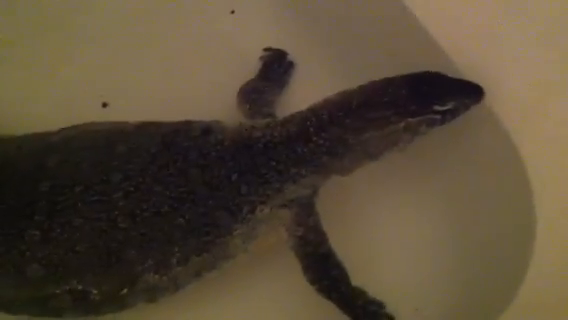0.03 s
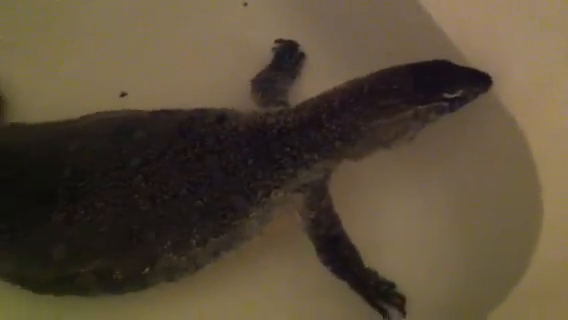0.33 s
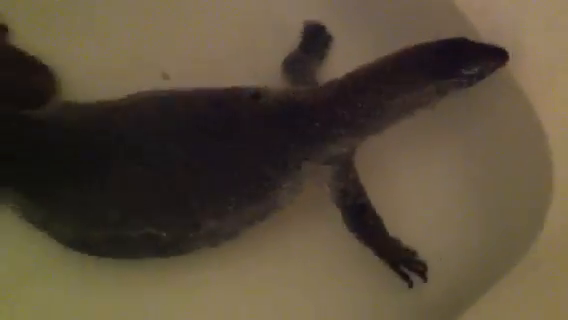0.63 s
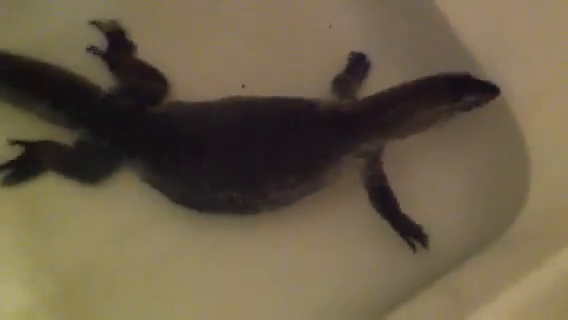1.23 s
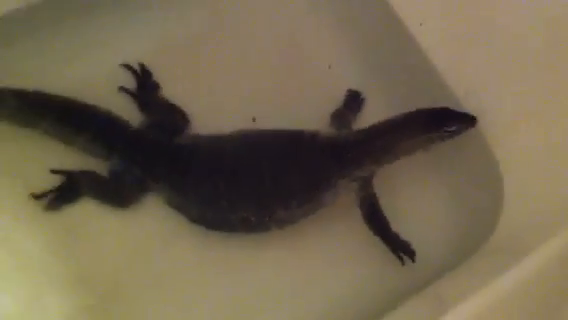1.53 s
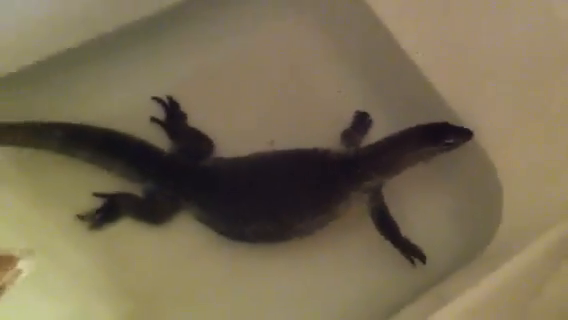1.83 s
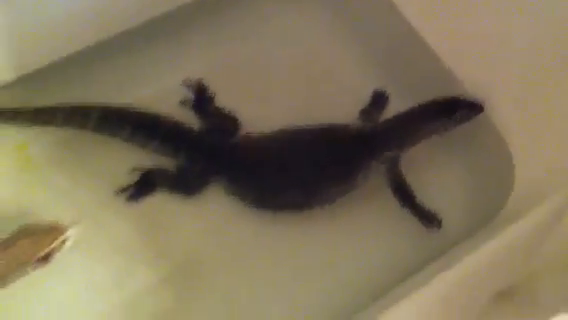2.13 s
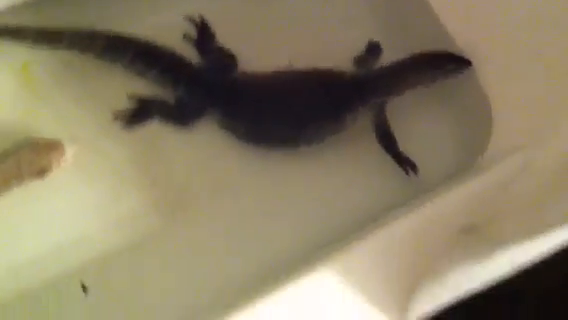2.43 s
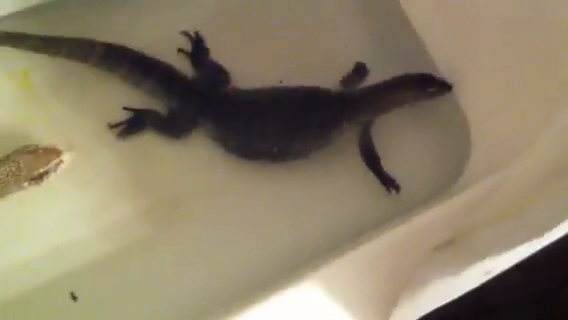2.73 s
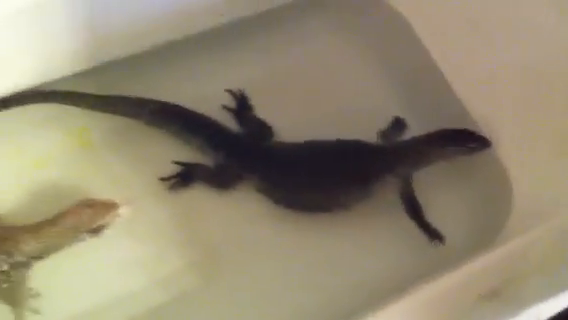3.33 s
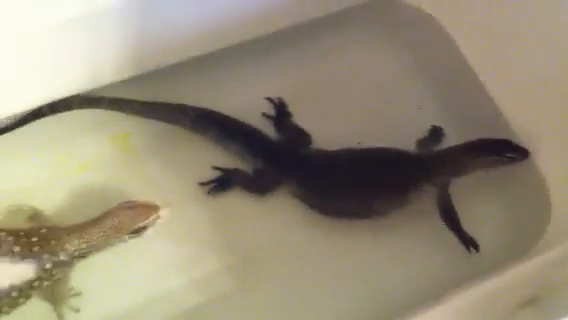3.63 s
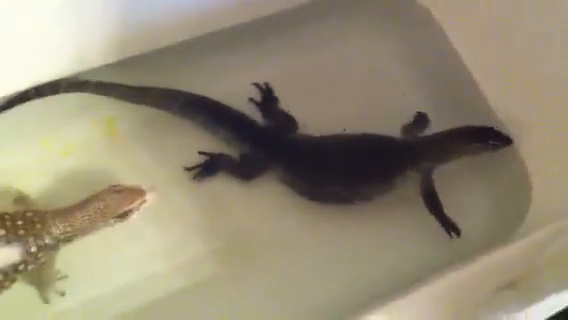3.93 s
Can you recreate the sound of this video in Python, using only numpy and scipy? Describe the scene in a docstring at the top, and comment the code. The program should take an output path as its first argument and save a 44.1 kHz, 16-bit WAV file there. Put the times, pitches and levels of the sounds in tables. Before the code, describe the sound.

Camera handling knocks and one hard click, with faint tub water and low hiss.

```python
"""A hand-held camera clicks and knocks in the grip, in a quiet bathroom.
A loose part gives one hard click and faint ticks, and fingers knock on the case,
making it ring briefly. The hand also bumps softly and slides over the case.
Faint hollow plops come from the water or the handling. Water stirs in a tub
where lizards float, over the room's murmur and the microphone's hiss."""
import sys
import numpy as np
from scipy import signal
from scipy.fft import rfft, irfft
from scipy.io import wavfile

SR = 44100
rng = np.random.default_rng(int(sys.argv[2]) if len(sys.argv) > 2 else 0)


def inscribe(sig):
    """Save sig as 16-bit PCM at rate SR to the path in sys.argv[1].

    A 1-D sig is mono; a 2-D sig holds one channel per row.
    Samples are clipped to [-1, 1] before scaling.
    """
    pcm = np.round(np.clip(np.atleast_2d(sig).T, -1, 1) * 32767)
    wavfile.write(sys.argv[1], SR, pcm.astype(np.int16))


N = 176400  # 4 seconds


def amp(db):
    """Turns decibels into a number to multiply a sound by."""
    return 10 ** (np.asarray(db) / 20)


def unit(x):
    """Scales a sound to an average strength (rms) of 1."""
    return x / np.sqrt(np.mean(x ** 2) + 1e-20)


def add(mix, start_s, sound):
    """Mixes a sound in at its start time."""
    part = mix[max(round(start_s * SR), 0):][:len(sound)]
    part += sound[:len(part)]


def cut_bass(x, hz):
    """Weakens everything below the given pitch."""
    return signal.sosfilt(signal.butter(4, hz, "high", fs=SR, output="sos"), x)


def noise(tone):
    """Noise whose balance of lows and highs follows a tone table."""
    hz, db = np.transpose(tone)
    gain = amp(np.interp(np.log(np.fft.rfftfreq(N, 1 / SR) + 1), np.log(hz), db))
    return unit(irfft(rfft(rng.standard_normal(N)) * gain, N))


def wander(rate_hz):
    """A smooth random wobble, up to about the given rate."""
    keep_slow = np.exp(-(np.fft.rfftfreq(N, 1 / SR) / rate_hz) ** 2)
    return unit(irfft(rfft(rng.standard_normal(N)) * keep_slow, N))


# Tone of the murmur and hiss: pitch_hz, level_db
ROOM_TONE = [(20, -22.5), (45, -17.5), (75, -9), (115, 4.5), (300, -2), (600, -6.5), (1200, -9.5),
             (2200, -9), (3800, -11.5), (6000, -11.5), (8000, -16), (11000, -21.5), (15800, -27)]
def room(level_db=-71.5):
    """The room murmurs and the microphone hisses steadily."""
    return amp(level_db) * noise(ROOM_TONE)


# How loudly the water stirs: time_s, level_db
WATER_LEVELS = [(0, -78.5), (.7, -79.5), (1.1, -72.5), (1.5, -78.5), (2.1, -74.5), (2.35, -68),
                (2.6, -70.5), (2.8, -71), (3.15, -77), (3.4, -72.5), (3.7, -71), (4, -71.5)]
# Tone of the water: pitch_hz, level_db
WATER_TONE = [(30, -30.5), (80, -10), (130, -9), (350, 1.5), (600, -6.5), (1300, -8.5), (2200, -18.5),
              (5000, -44), (16000, -57)]
def water(lap_db=1):
    """Water laps in the tub with a low, uneven sound."""
    level_db = np.interp(np.arange(N) / SR, *np.transpose(WATER_LEVELS))
    return noise(WATER_TONE) * amp(level_db + lap_db * wander(rate_hz=16))


# Short hollow plops and knocks, from the water or from handling the camera:
# start_s, level_db, pitch_hz, rise_s, glide_octaves_per_s
HOLLOW_PLOPS = [(.012, -65, 1536, .006, -1), (1.2108, -45.5, 320, 0.0023, 108),
                (1.909, -58, 304, 0.0035, 15), (1.9205, -51, 457, 0.0024, 18),
                (1.9765, -41.5, 575, .0028, -6), (1.976, -45.5, 257, 0.0056, 15.5)]
def plops():
    """Each hollow plop or knock swells quickly and dies away while its pitch glides."""
    out, t = np.zeros(N), np.arange(SR // 20) / SR
    for start_s, level_db, pitch_hz, rise_s, glide in HOLLOW_PLOPS:
        octaves = np.minimum(glide * t, 1)  # climbs one octave at most
        cycles = np.cumsum(pitch_hz * 2 ** octaves) / SR
        swell = t / rise_s * np.exp(1 - t / rise_s)
        add(out, start_s, amp(level_db) * swell * np.sin(2 * np.pi * cycles))
    return out


# Tones of the skin's rub and of its hiss: pitch_hz, level_db
RUB_TONE = [(60, -30), (300, 3.5), (850, 2.5), (1400, 2.5), (2000, -10), (3300, -11), (16000, -54)]
HISS_TONE = [(60, -42), (1000, -20), (1600, 1.5), (2300, 1), (3600, -14), (5000, -6.5), (6400, -4.5),
             (8500, -15.5), (16000, -33)]
# Slides of the hand: start_s, length_s, level_db, hiss_vs_rub_db, rise_s
HAND_SLIDES = [(0., 0.27, -70.5, 3.5, 0.03), (0.334, 0.24, -71, -4.5, 0.0098),
               (.797, .008, -57, -1, 0.0018), (0.801, 0.2, -73, 8, 0.0072), (1.11, 0.22, -76, 0, 0.038),
               (1.489, 0.23, -68.5, -0.5, 0.08), (1.768, 0.063, -67, 4, 0.0081),
               (2.196, 0.17, -71.5, -4, 0.083), (2.907, 0.14, -68.5, -5.5, 0.031),
               (3.546, 0.14, -66, -23, 0.065)]
def slides(grain_db=2.5, fade_s=0.081):
    """Skin slides over the case: a grainy rub with a hiss on top."""
    out, t = np.zeros(N), np.arange(N) / SR
    rub, hiss = noise(RUB_TONE), noise(HISS_TONE)
    for start_s, length_s, level_db, hiss_vs_rub_db, rise_s in HAND_SLIDES:
        press = np.clip((t - start_s) / rise_s, 0, 1)
        let_go = np.clip((start_s + length_s - t) / min(fade_s, length_s), 0, 1)
        hiss_gain = amp(hiss_vs_rub_db)
        blend = (rub + hiss_gain * hiss) / np.hypot(1, hiss_gain)  # same strength for any blend
        out += amp(level_db) * press * let_go * blend
    return out * amp(grain_db * wander(rate_hz=200))


# Soft bumps of the hand: start_s, level_db, pitch_hz
HAND_BUMPS = [(0.171, -62, 133), (0.37, -53, 136), (1.849, -62, 150), (2.46, -57.5, 169),
              (2.57, -63.5, 160), (2.681, -58.5, 165), (2.938, -56.5, 167), (2.976, -60.5, 148),
              (3.301, -53.5, 230), (3.328, -58, 180), (3.372, -57.5, 177), (3.486, -58.5, 131),
              (3.548, -58.5, 162), (3.735, -60, 146), (3.806, -55.5, 166)]
def bumps(rise_s=0.0055, roughness=0.31):
    """The flesh of the hand gives dull thuds of a few uneven cycles."""
    out, t = np.zeros(N), np.arange(SR // 10) / SR
    swell = t / rise_s * np.exp(1 - t / rise_s)
    wobble = wander(rate_hz=150)
    for start_s, level_db, pitch_hz in HAND_BUMPS:
        bend = 1 + roughness * np.roll(wobble, -round(start_s * SR))[:len(t)]
        cycles = np.cumsum(pitch_hz * bend) / SR
        add(out, start_s, amp(level_db) * swell * np.sin(2 * np.pi * cycles))
    return cut_bass(out, hz=100)


def strike(notes, wave, contact_ms, bass_cut_hz):
    """A short push rings an object's own notes; longer contact sounds duller."""
    t = np.arange(SR // 8) / SR
    # Each note fades by 60 dB in ring_s.
    ring = sum(amp(db - 60 * t / ring_s) * wave(2 * np.pi * hz * t) for hz, db, ring_s in notes)
    push_time_ms = (t[:256] + .5 / SR) * 1000
    push = np.sin(np.pi * np.clip(push_time_ms / contact_ms, 0, 1)) ** 1.5
    return cut_bass(np.convolve(ring, push / push.sum()), bass_cut_hz)


# Notes the case rings with: pitch_hz, level_db, ring_s
CASE_NOTES = [(334, -42, 0.082), (473, -31, 0.036), (747, -31, 0.019), (976, -24, 0.0107),
              (1463, -17, 0.0064), (2527, -44, 0.011), (5600, -18.5, 0.0049)]
# Knocks of the fingers: start_s, level_db, contact_ms
FINGER_KNOCKS = [(.176, -36, 0.58), (0.376, -39, .3), (0.521, -47, .7), (1.732, -33, 0.74),
                 (1.9227, -32, .5), (1.929, -30.5, 0.82), (1.966, -27, .9), (1.9774, -22, 0.53),
                 (1.9833, -20.5, 0.51), (2.3128, -1, .3), (2.4754, -30, 0.19), (2.845, -33, 0.85),
                 (3.812, -38, 0.78)]
def knocks():
    """Fingers knock on the case, which swings up from rest (a sine wave)."""
    out = np.zeros(N)
    for start_s, level_db, contact_ms in FINGER_KNOCKS:
        add(out, start_s, amp(level_db) * strike(CASE_NOTES, np.sin, contact_ms, bass_cut_hz=151))
    return out


# Notes of the loose part and the case together: pitch_hz, level_db, ring_s
PART_NOTES = [(207, -31, 0.01683), (295.7, -33.5, 0.066), (500, -25, 0.036), (601, -27.5, 0.03),
              (655, -23, 0.027), (899, -27.5, 0.017), (1230, -16.5, .015), (1398, -17, 0.011),
              (1815, -20.5, 0.0098), (2420, -8.5, 0.0051), (3600, -29, .005), (8000, -4, 0.0014),
              (10100, -11, .002)]
# Faint ticks and one hard click: start_s, level_db, contact_ms
PART_CLICKS = [(.468, -43.5, 0.48), (1.671, -41, 0.9), (1.7485, -40, 0.37), (2.684, -49, 0.42),
               (2.972, -51, .45), (3.0641, 0, 0.22)]
def clicks():
    """A loose part on the camera snaps, ringing at full swing at once (a cosine wave)."""
    out = np.zeros(N)
    for start_s, level_db, contact_ms in PART_CLICKS:
        add(out, start_s, amp(level_db) * strike(PART_NOTES, np.cos, contact_ms, bass_cut_hz=167))
    return out


def scene():
    """Handling sounds over the water and the room, in one channel."""
    # These reach the microphone through the case, so they have no echo.
    handling = clicks() + knocks() + bumps() + slides()
    return (handling + plops() + water() + room())[None]


def record(dry, top_hz=15750):
    """Takes away the very highest treble."""
    treble_cut = signal.firwin(511, top_hz, window=("kaiser", 9), fs=SR)
    return signal.oaconvolve(dry, treble_cut[None], "same")


dry = scene()
out = record(dry)
inscribe(out)
```